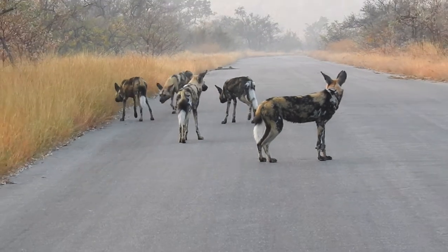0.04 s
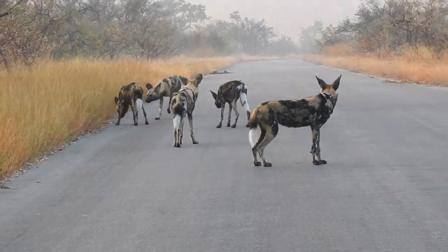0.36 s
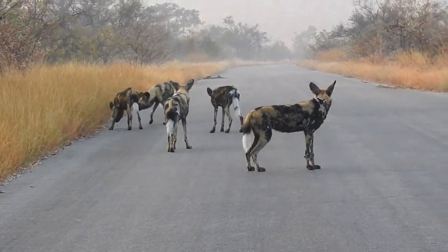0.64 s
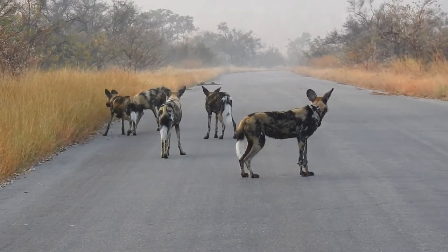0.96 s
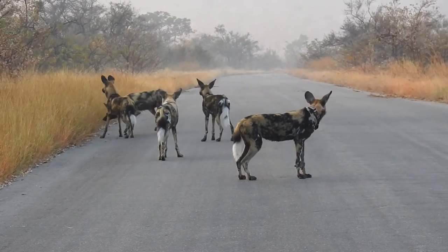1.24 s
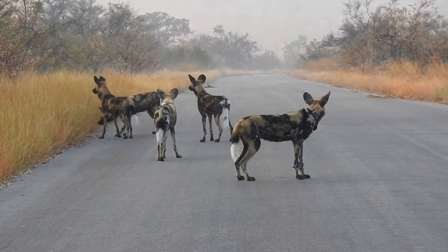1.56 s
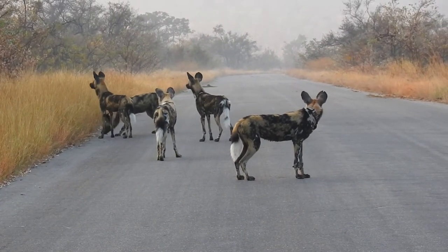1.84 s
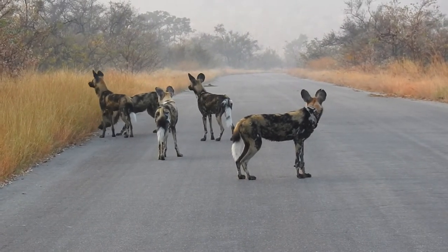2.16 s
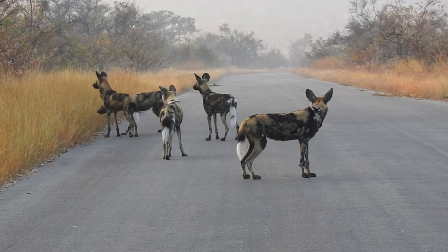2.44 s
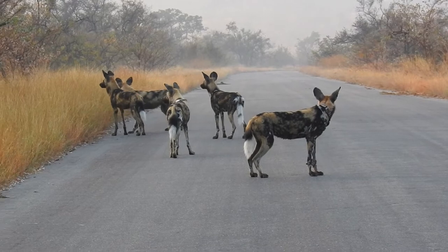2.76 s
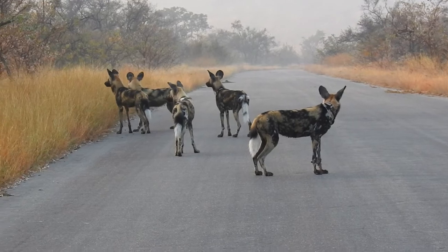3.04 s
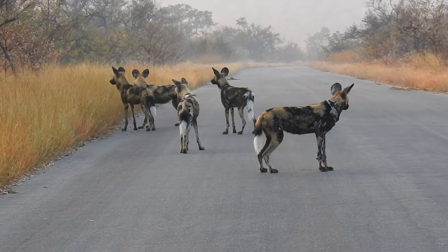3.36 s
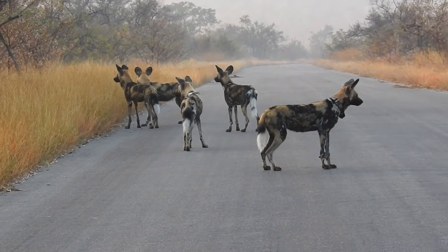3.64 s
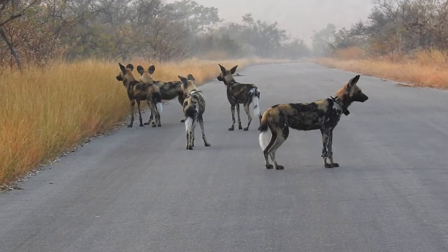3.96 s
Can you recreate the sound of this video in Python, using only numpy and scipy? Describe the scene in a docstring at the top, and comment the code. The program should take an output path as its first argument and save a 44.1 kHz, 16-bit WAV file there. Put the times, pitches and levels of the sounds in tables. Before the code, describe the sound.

Faint, high bird chirps and short whistles come from the scrub beside a road, with more distant calls later. Engines idle softly under a steady hiss, and brief handling clicks and bumps sound near the microphone early and late.

```python
"""A bush road in the early morning, heard from a standing vehicle over idling engines and faint hiss.
At first birds whistle near-sine notes while something handled close by creaks, knocks and clicks,
its slips and contacts ringing damped resonances. Swoops follow, flaring at the throat's resonance,
then twitters that die away and more whistles, all echoed by the scrub. Distant calls thicken in the
second half; near the end the handling knocks and clicks again among the last swoops and a whistle."""
import sys
import numpy as np
from scipy import signal
from scipy.io import wavfile

SR = 44100
rng = np.random.default_rng(int(sys.argv[2]) if len(sys.argv) > 2 else 0)


def master_out(mix):
    """Clip the mix to full scale and print it as 16-bit PCM to the path in sys.argv[1]."""
    frames = np.transpose(np.atleast_2d(mix))
    ceiling = np.clip(frames, -1, 1)
    pcm = np.round(ceiling * 32767).astype(np.int16)
    wavfile.write(sys.argv[1], SR, pcm)


N = 176400
TIME = np.arange(N) / SR


def from_db(db):
    """Amplitude ratio of a level: tenfold per 20 dB."""
    return 10 ** (np.asarray(db) / 20)


def rms_one(x):
    """Normalisation to unit rms."""
    return x / np.sqrt(np.mean(x ** 2) + 1e-20)


def at_hz(points, hz):
    """Interpolation on a logarithmic frequency axis."""
    freqs, values = np.array(points).T
    return np.interp(np.log(hz), np.log(freqs), values)


def drift(corner_hz):
    """Random modulation: low-passed noise of unit rms."""
    step, settle = 40, 2000
    pole = np.exp(-2 * np.pi * corner_hz * step / SR)
    noise = rng.standard_normal(N // step + settle + 2)
    slow = signal.lfilter([1], [1, -2 * pole, pole * pole], noise)[settle:]
    return np.interp(np.arange(N) / step, np.arange(len(slow)), rms_one(slow))


def span(start, length):
    """Time window: an event's sample indices i and its progress u from 0 to 1."""
    i = np.flatnonzero((TIME >= start) & (TIME < start + length))
    return i, (TIME[i] - start) / length


def fade(u, length, attack_s, release_s):
    """Envelope with sine-squared edges."""
    rise = np.sin(np.pi / 2 * np.minimum(u * length / attack_s, 1)) ** 2
    fall = np.sin(np.pi / 2 * np.minimum((1 - u) * length / release_s, 1)) ** 2
    return rise * fall


def arc(u, first, middle, last):
    """Parabolic glide through three frequencies."""
    return np.polyval(np.polyfit([0, .5, 1], [first, middle, last], 2), u)


def panned(x, pan_db):
    """Direction by level difference, left minus right."""
    return x * from_db(np.array([[.5], [-.5]]) * pan_db)


def sing(notes, wobble, flutter_db):
    """Birdsong as sine tones with random frequency and amplitude modulation."""
    out = np.zeros((2, N))
    detune = 1 + wobble * drift(160)
    flutter = from_db(flutter_db * drift(110))
    for i, hz, gain, pan_db in notes:
        phase = 2 * np.pi * np.cumsum(hz * detune[i]) / SR
        out[:, i] += panned(np.sqrt(2) * gain * flutter[i] * np.sin(phase), pan_db)
    return out


def whistles():
    """Sustained tones: phrases of held notes, each slightly bent in frequency."""
    # held notes: start t/s, length t/s, first, middle, last f/Hz, relative level/dB, pan level/dB
    notes = [(-.012, 0.052, 4060, 3920, 3940, -44.5, 2), (0.022, 0.055, 4008, 3958, 4030, -38, 2.5),
             (0.063, 0.059, 3930, 4130, 4260, -42.5, 6), (0.104, 0.059, 5330, 5340, 5370, -44.5, -4),
             (1.034, 0.036, 4280, 4140, 4020, -54, 4), (1.053, 0.04, 3920, 3767, 3870, -43.5, 2.5),
             (1.083, 0.022, 5700, 5700, 5300, -51, -4), (1.095, 0.078, 4950, 5000, 5480, -64, -2),
             (1.144, 0.036, 5370, 5520, 5280, -55, -7), (2.031, 0.062, 4050, 3880, 3980, -47.5, 2.5),
             (2.093, 0.057, 3905, 4016, 4120, -58, 18), (2.112, 0.046, 4090, 4140, 4230, -46.5, 6),
             (2.144, 0.045, 5460, 5390, 5550, -58, -1), (2.413, 0.079, 4220, 4400, 4500, -71, 14),
             (2.464, 0.098, 4380, 4330, 4590, -71, 4), (2.589, 0.101, 4150, 4290, 4230, -57, 4.5),
             (3.96, 0.054, 4150, 3870, 4180, -41, 1.5)]
    for start, length, first, middle, last, db, pan_db in notes:
        i, u = span(start, length)
        gain = from_db(db - 2) * fade(u, length, attack_s=0.019, release_s=0.017)
        yield i, arc(u, first, middle, last), gain, pan_db


def swoops():
    """Resonance: a glide flares up as its frequency crosses that of the bird's throat."""
    # glides: start t/s, length t/s, first, last, throat f/Hz, relative level/dB, pan level/dB
    glides = [(.56, 0.059, 3130, 4220, 3440, -43.5, 1.5), (0.649, 0.044, 4030, 3320, 3590, -48, 2),
              (0.776, 0.073, 5250, 2976, 3306, -45.5, 3), (0.979, 0.068, 5100, 3050, 3390, -42.5, 2),
              (3.669, 0.055, 3154, 3840, 3370, -50, -2.5), (3.783, 0.044, 3620, 3150, 3310, -46, 0),
              (3.939, 0.034, 5700, 4020, 4100, -49.5, 4), (3.971, 0.037, 4000, 3010, 3320, -46.5, 1.5)]
    half_width_hz, edge_s = 106, 0.01
    for start, length, first, last, throat, db, pan_db in glides:
        i, u = span(start, length)
        hz = 1 / ((1 - u) / first + u / last)   # the period changes linearly
        attack_s = edge_s if last > first else .38 * length
        resonance = 1 / np.hypot(1, (hz - throat) / half_width_hz)
        yield i, hz, from_db(db - 1.5) * fade(u, length, attack_s, edge_s) * resonance, pan_db


def twitters():
    """Tone pulses: tiny bent notes under bell-shaped envelopes."""
    # short notes: start t/s, length t/s, first, middle, last f/Hz, relative level/dB
    notes = [(.48, 0.012, 3050, 3430, 4000, -57.5), (.494, 0.0093, 4050, 3530, 3080, -55),
             (1.161, 0.024, 3320, 3740, 3570, -55), (1.176, 0.022, 3530, 3247, 3280, -42),
             (1.21, 0.042, 3120, 3380, 3770, -50.5), (1.234, 0.022, 3850, 3530, 3280, -51),
             (1.27, 0.03, 3200, 3256, 3230, -45), (1.361, 0.028, 3450, 3340, 3280, -46.5),
             (1.409, 0.025, 3090, 3570, 4100, -56.5), (1.426, 0.03, 3800, 3980, 3840, -58),
             (1.468, 0.027, 3040, 3090, 3020, -56), (1.547, 0.034, 3280, 3190, 3300, -49.5),
             (1.597, 0.023, 3100, 3460, 3860, -57), (1.654, 0.025, 3080, 3130, 3170, -59.5),
             (1.733, 0.036, 3080, 3080, 3050, -62.5), (1.78, 0.018, 3060, 3460, 3800, -58.5),
             (1.841, 0.035, 3130, 3150, 3230, -61.5)]
    for start, length, first, middle, last, db in notes:
        i, u = span(start, length)
        gain = from_db(db - 4) * fade(u, length, length / 2, length / 2)
        yield i, arc(u, first, middle, last), gain, 0


def body(x, modes, tilt_db, order):
    """Modal superposition, tilted in dB per octave; order 2 deepens the valleys between modes."""
    out = 0
    for k, (hz, width, db) in enumerate(modes):
        radius = np.exp(-np.pi * width / SR)
        scale = (1 - radius ** 2) / 2
        resonator = [scale, 0, -scale, 1, -2 * radius * np.cos(2 * np.pi * hz / SR), radius ** 2]
        gain = from_db(db + tilt_db * np.log2(hz / modes[0][0]))
        out = out + (-1) ** k * gain * signal.sosfilt([resonator] * order, x + 1e-18)
    return out


def rub(start, length, db, modes, tilt_db=0, order=1, slips_per_s=3000):
    """Impulse excitation: a run of uneven slips swells, fades and rings a body."""
    timing, strength = rng.standard_normal((400, 2)).T
    u = np.cumsum(np.exp(.3 * timing)) / (slips_per_s * length)
    times = start + u * length
    live = (u < 1) & (times > 0)
    slips = np.zeros(N)
    slips[(times[live] * SR).astype(int)] = np.sin(np.pi * u[live]) ** 2 * from_db(1.5 * strength[live])
    ringing = rms_one(body(slips, modes, tilt_db, order))
    return from_db(db) * ringing * np.sqrt(length * SR / N)   # db is the level over the run


def creaks():
    """Stick-slip friction: a few hundred slips a second drive the handled object's modes."""
    # runs of slips: start t/s, length t/s, slip rate f/Hz, level/dB, tilt/(dB per octave)
    runs = [(-.02, 0.098, 200, -62.5, 3), (0.052, 0.051, 340, -47.5, -4.5), (0.136, 0.033, 407, -42.5, 7),
            (0.152, 0.0302, 380, -45.5, 4.5), (0.218, 0.022, 450, -55, -5)]
    # creaking modes: centre f/Hz, width f/Hz, relative level/dB
    modes = [(372, 140, -11.5), (928, 99, 6), (1073, 49, 16.5), (1199, 68, 3.5), (1787, 110, -1.5),
             (2100, 65, -14), (2510, 120, -10), (2757, 190, -1)]
    return sum(rub(start, length, db, modes, tilt_db, order=2, slips_per_s=rate)
               for start, length, rate, db, tilt_db in runs)


def clicks():
    """Dense contacts ring high modes; level and arrival-time differences place them to the left."""
    # clicks and rattle: start t/s, length t/s, level/dB, pan level/dB
    bursts = [(-.01, .075, -59, 8.5), (0.145, 0.054, -51, 10.5), (0.165, 0.002, -31, 13),
              (3.757, 0.0098, -29.5, 5), (3.765, 0.014, -58, -3)]
    # bright modes: centre f/Hz, width f/Hz, relative level/dB
    modes = [(4590, 220, -11.5), (5390, 310, -6), (6010, 420, -4.5), (6480, 184, 9), (7160, 240, -1.5),
             (7684, 410, -10), (8900, 960, -23)]
    right_lag_s = 5.4e-5
    left, right = sum(panned(rub(start, length, db, modes, order=2), pan_db)
                      for start, length, db, pan_db in bursts)
    return np.array([left, np.interp(TIME - right_lag_s, TIME, right)])


def knocks():
    """Impact: a brief burst of contacts rings damped midrange modes."""
    # dull knocks: start t/s, length t/s, level/dB, tilt/(dB per octave)
    impacts = [(0.158, 0.0035, -41.5, 18), (3.751, 0.011, -46.5, -8.5)]
    # struck modes: centre f/Hz, width f/Hz, relative level/dB
    modes = [(557, 240, -8), (840, 170, -1), (1276, 79, 12.5), (1635, 176, 8), (2124, 100, 10.5),
             (2700, 180, -13)]
    return sum(rub(start, length, db, modes, tilt_db) for start, length, db, tilt_db in impacts)


def thumps():
    """Low tone bursts: a few cycles under a half-sine envelope."""
    # soft bumps: start t/s, length t/s, f/Hz, level/dB
    bumps = [(.19, 0.075, 203, -61), (3.748, .03, 180, -54.5), (3.785, 0.033, 95, -54)]
    out = np.zeros(N)
    for start, length, hz, db in bumps:
        i, u = span(start, length)
        out[i] += np.sqrt(2) * from_db(db) * np.sin(np.pi * u) * np.sin(2 * np.pi * hz * length * u)
    return out


def engine(cycle_hz, orders):
    """Harmonic series: an idling engine hums at multiples of its slightly wandering cycle rate."""
    cycles = cycle_hz * np.cumsum(1 + 0.0011 * drift(1.0)) / SR
    out = 0
    for multiple, db in orders:
        amplitude = np.sqrt(2) * from_db(db - 0.53 * drift(2.9))
        out = out + amplitude * np.sin(2 * np.pi * (multiple * cycles + rng.random()))
    return out


def engines():
    """Beating: neighbouring harmonics of two idling engines interfere."""
    # harmonics of the faster engine: multiple of the cycle rate, level/dB
    fast_orders = [(9, -73.5), (10, -75), (12, -68.5), (13, -67), (15, -56.5), (16, -59), (18, -61),
                   (19, -76), (22, -68.5), (24, -75.5), (26, -72), (27, -76), (30, -79)]
    # harmonics of the slower engine: multiple of the cycle rate, level/dB
    slow_orders = [(8, -72), (16, -70.5), (20, -59), (25, -66.5)]
    return engine(cycle_hz=7.369, orders=fast_orders) + engine(cycle_hz=6.193, orders=slow_orders)


def far_birds():
    """Linear glides, faint with distance: single calls, and later a chatter of overlapping notes."""
    # distant calls: start t/s, length t/s, f/Hz, level/dB
    calls = [(0.247, 0.047, 4420, -71), (0.781, 0.06, 2340, -67.5), (0.844, 0.044, 2650, -69.5),
             (2.26, 0.047, 3620, -71), (2.472, 0.07, 4040, -68.5), (2.696, 0.049, 3600, -70),
             (3.07, 0.046, 2300, -66), (3.155, 0.056, 3210, -67.5), (3.216, 0.054, 2350, -68.5),
             (3.394, 0.049, 3180, -68), (3.447, 0.059, 2332, -67), (3.482, 0.036, 3500, -65),
             (3.518, 0.041, 2283, -64.5), (3.709, 0.073, 2280, -63), (3.932, 0.07, 2310, -65)]
    chorus_start_s, notes_per_s, note_s, note_db = 2.2, 40, 0.048, -76
    low_hz, high_hz = 2170, 3900
    chorus = [(chorus_start_s + (k + when) / notes_per_s, note_s,
               low_hz * (high_hz / low_hz) ** pitch, note_db)
              for k, (when, pitch) in enumerate(rng.random((120, 2)))]
    for start, length, hz, db in calls + chorus:
        i, u = span(start, length)
        bend = 0.021 * rng.uniform(-1.22, 1)
        gain = from_db(db) * fade(u, length, attack_s=0.016, release_s=0.016)
        yield i, hz * (1 + bend * (1 - 2 * u)), gain, 0


def echoes(x, t60_s, shortest_s, longest_s):
    """Reverberation by comb filters, ten a side, scaled to the level of the input."""
    out = np.zeros((2, N))
    for k, lag in enumerate((rng.uniform(shortest_s, longest_s, 20) * SR).astype(int)):
        side = k % 2
        loop = x[side].copy()
        feedback = from_db(-60 * lag / SR / t60_s)
        for i in range(lag, N, lag):
            loop[i:i + lag] += feedback * loop[i - lag:i][:N - i]
        out[side] += (loop - x[side]) * (-1) ** (k // 2)
    return rms_one(out) * np.std(x)


def air():
    """Partly coherent noise in half-octave bands, wider and steadier towards the treble."""
    # spectral density of road rumble and hiss: f/Hz, relative level/dB
    spectrum = [(25, -12), (45, -9), (80, -1), (120, 4.5), (190, -1.5), (300, -9.5), (550, -13.5),
                (850, -12), (1400, -18), (2400, -16.5), (3500, -20.5), (5000, -18.5), (7200, -24),
                (10000, -28.5), (15000, -37)]
    # likeness of left and right: f/Hz, correlation coefficient
    coherence = [(40, 0.62), (120, 0.74), (250, 0.47), (500, 0.35), (1000, 0.38), (2500, 0.45),
                 (6000, 0.16), (14000, .1)]
    edges = 20 * 2 ** (np.arange(21) / 2)
    white = rng.standard_normal((2, 2, N))
    out = 0
    for k, (low, high) in enumerate(zip(edges, edges[1:])):
        bandpass = signal.butter(2, [low, high], "band", fs=SR, output="sos")
        mid, side = signal.sosfilt(bandpass, white[k % 2])
        hz = np.sqrt(low * high)
        alike = at_hz(coherence, hz)
        band = np.sqrt(1 + alike) * mid + np.sqrt(1 - alike) * side * [[1], [-1]]
        flicker_db = 2.75 if hz < 2500 else 1
        out = out + from_db(at_hz(spectrum, hz) + flicker_db * drift(8.4)) * band
    return from_db(-58.5) * rms_one(out)


def scene():
    """Superposition of direct and reflected sound: birds in the scrub, handling in the cabin, hum, air."""
    birds = sing(whistles(), wobble=0.0036, flutter_db=2.63)
    birds += sing([*swoops(), *twitters()], wobble=0.014, flutter_db=3)
    far = sing(far_birds(), wobble=0.012, flutter_db=2)
    into_scrub = from_db(-15) * birds + from_db(-5) * far
    scrub = echoes(into_scrub, t60_s=0.25, shortest_s=0.0087, longest_s=0.045)
    scrub *= drift(135)   # scattering blurs the tails
    background = engines() + air()
    handling = creaks() + thumps() + knocks() + clicks()
    cabin = from_db(-8) * echoes(handling, t60_s=0.045, shortest_s=0.0033, longest_s=.012)
    return birds + far + scrub + handling + cabin + background


def record(dry):
    """Band limiting by a steep elliptic low-pass filter."""
    cutoff_hz = 15700
    return signal.sosfilt(signal.ellip(12, .1, 80, cutoff_hz, fs=SR, output="sos"), dry)


dry = scene()
out = record(dry)
master_out(out)
```